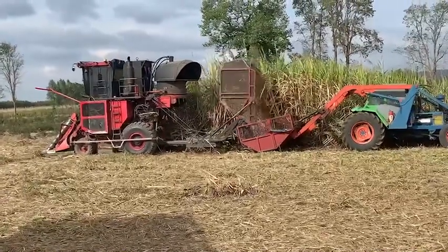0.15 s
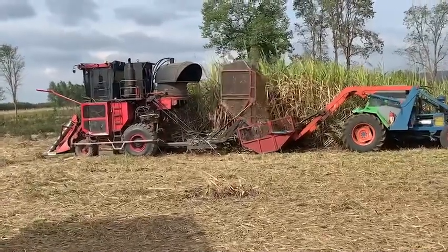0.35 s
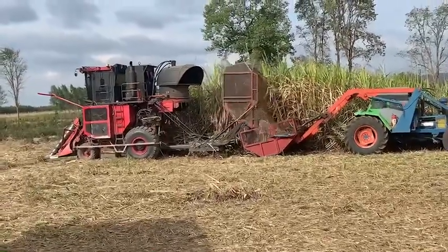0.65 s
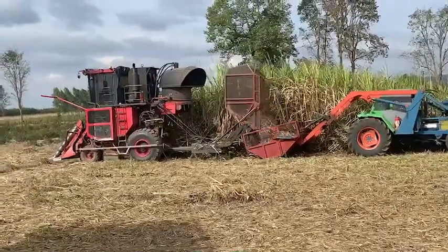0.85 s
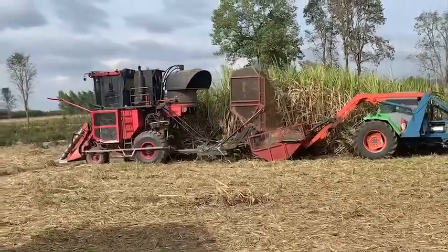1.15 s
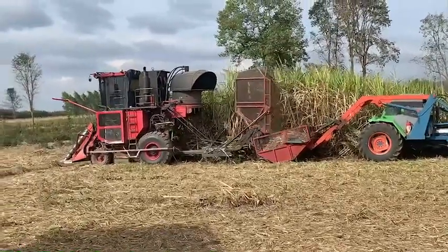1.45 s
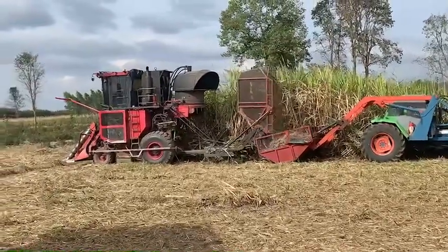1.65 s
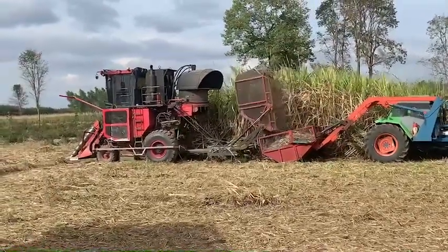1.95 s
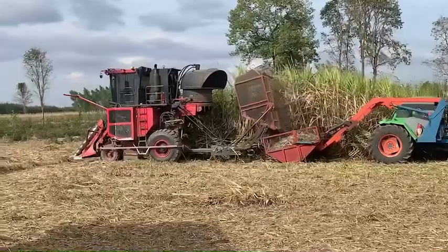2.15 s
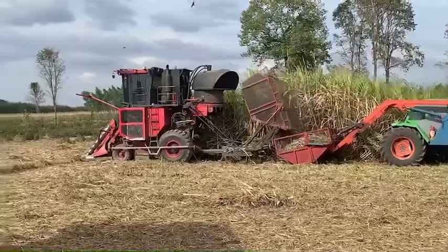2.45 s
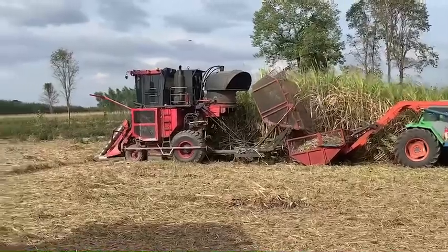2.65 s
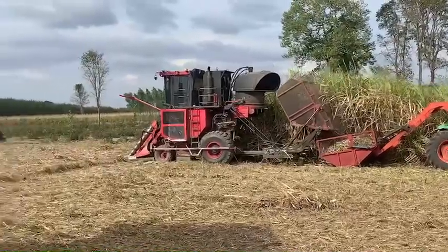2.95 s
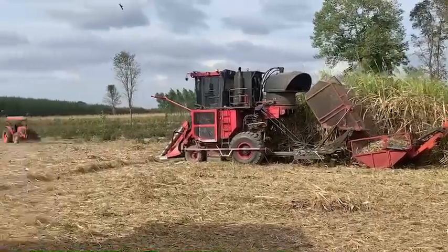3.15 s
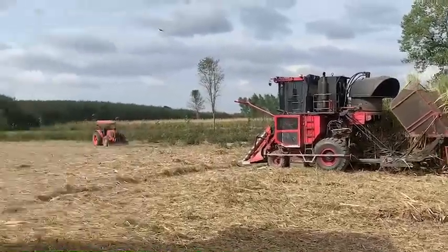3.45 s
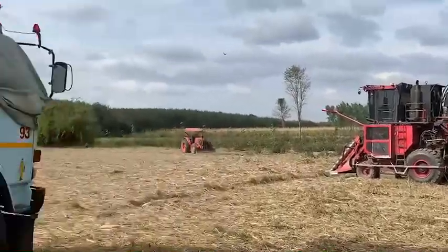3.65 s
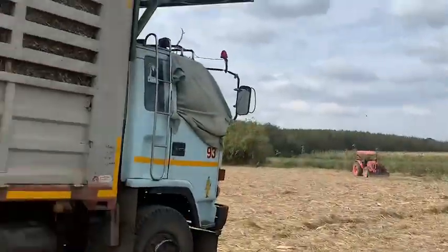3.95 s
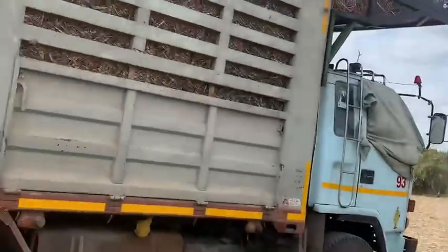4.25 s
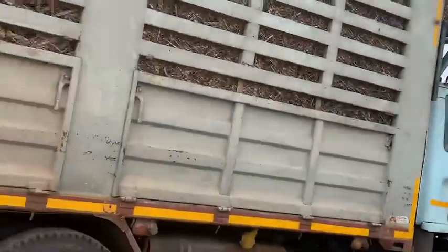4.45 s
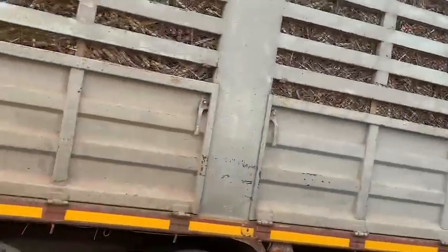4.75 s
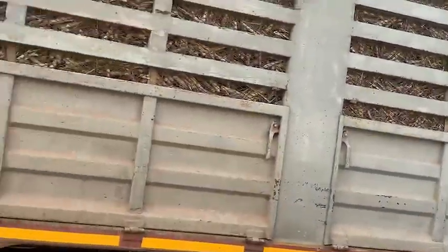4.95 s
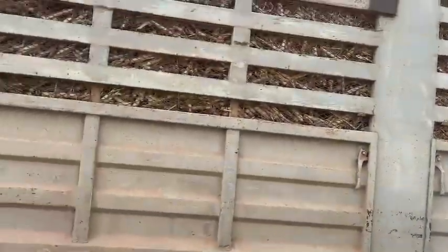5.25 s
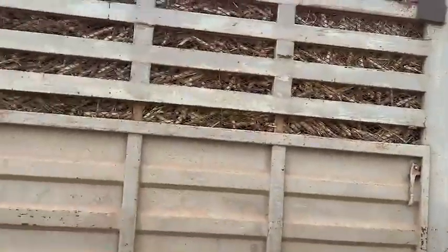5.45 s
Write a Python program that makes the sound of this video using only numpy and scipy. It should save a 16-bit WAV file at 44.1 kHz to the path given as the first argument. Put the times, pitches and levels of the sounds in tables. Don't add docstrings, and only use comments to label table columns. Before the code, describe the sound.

Heavy farm machinery drones and chops cane in an open field, a whine riding on top, then gusty wind buffets the microphone.

```python
import sys
import numpy as np
from scipy import signal
from scipy.fft import rfft, irfft, next_fast_len
from scipy.io import wavfile
from scipy.ndimage import uniform_filter1d, map_coordinates

SR = 44100
rng = np.random.default_rng(int(sys.argv[2]) if len(sys.argv) > 2 else 0)


def dump_mix(stems):
    frames = np.atleast_2d(stems).T
    limited = np.clip(frames, -1, 1)
    pcm = np.round(limited * 32767).astype(np.int16)
    wavfile.write(sys.argv[1], SR, pcm)


def makeup_ratio(level_db):
    decades = np.asarray(level_db, float) / 20
    return 10 ** decades


N = 246507

# time in seconds, level in dB.
BREEZE = [(0, -30.5), (.4, -24), (.75, -29), (1.0, -30), (1.5, -33), (2.2, -37), (2.45, -27.5), (2.9, -23),
          (3.4, -29), (4.3, -32), (4.9, -27.5), (5.59, -21.5)]
# crest in seconds, level in dB, rise in seconds.
GUSTS = [(.31, -20, 0.024), (.6, -36, 0.031), (1.59, -29, .025), (1.95, -29, 0.097), (2.18, -29, 0.11),
         (2.49, -27, 0.074), (2.86, -46, .05), (3.05, -34, 0.04), (4.26, -21, 0.014), (4.43, -14.5, 0.065),
         (4.56, -24, 0.048), (4.63, -28, 0.046), (4.71, -27, .04), (5.05, -22, 0.048), (5.215, -17, 0.11),
         (5.38, -18, 0.058), (5.525, -21, 0.041)]
# start in seconds, peak in dB, length in seconds, left minus right in dB, pitch in Hz.
BUFFETS = [(4.317, -7.5, .005, -4, 398), (4.375, -11, 0.0069, 1, 393.5), (4.409, -1.5, 0.0047, 5, 340),
           (4.409, -4, 0.0023, 1, 620), (4.421, -5.5, .003, 0, 836), (4.439, -6, 0.0034, 0, 463),
           (4.418, 0.5, 0.0034, 2, 423), (4.431, -9, 0.0033, 0, 330), (4.501, -14, .005, 0, 396),
           (4.55, -10, 0.0029, -2, 382), (4.567, -10, 0.0084, 1, 392), (4.603, -6.5, .003, 2, 287),
           (4.637, -5, 0.0028, 2, 420), (4.718, -8, 0.0084, -2, 390), (4.754, -7, 0.004, -4, 530),
           (4.78, -8, 0.003, 0, 257), (5.13, -13, 0.0047, -4, 608), (5.148, -1, 0.0045, 1.0, 394),
           (5.189, -9, 0.0053, 3, 318), (5.225, -7, 0.0069, -3, 288), (5.336, -16, 0.0044, 10, 635),
           (5.329, -4, 0.0054, 3, 337), (5.374, 0.5, 0.0036, 1, 335), (5.382, -2.5, 0.0034, 3, 300),
           (5.446, -17, .005, -3.5, 285), (5.488, -2.5, 0.004, 0, 310), (5.504, -1, 0.003, 1, 331),
           (5.52, -2.5, 0.004, 2, 340)]
# start in seconds, peak in dB, length in seconds,
# left minus right in dB, pitch in Hz.
THUMPS = [(0.323, -7, 0.011, -2, 153), (0.589, -10, 0.014, 4, 130), (2.472, -19, 0.0091, 2, 97),
          (2.859, -7, 0.013, -7, 90), (3.04, -9, 0.01, 3, 170), (3.138, -6, .01, 0, 90),
          (4.238, -14, 0.01, -2, 95), (4.359, -11, .008, 0.0, 94.8), (4.413, 4, 0.0086, 0, 105),
          (4.429, 2, 0.0078, 1, 118), (4.425, -4, 0.01, 0, 197), (4.45, -4, 0.0074, 0, 128),
          (4.553, 2, 0.0098, -2, 99), (4.599, 3, 0.0023, 3, 170), (4.633, 1, 0.0023, 1, 168),
          (4.708, -1, 0.0095, 0, 99), (5.197, -3, 0.005, 7, 120), (5.211, 1, 0.0057, 7, 105),
          (5.239, -7, .006, 0, 110), (5.348, -4, .008, 2, 104), (5.383, -5, 0.0084, -1, 103),
          (5.508, 2, 0.0059, -3, 114), (5.533, 1, 0.0055, -1, 114.2), (5.558, -10, 0.0043, 4, 150)]

# level in dB at idle, at half revs, at top revs.
TRACTOR_ORDERS = [
    (-50, -31, -34),
    (-33.5, -27, -30),
    (-39.5, -34, -42),
]
TRACTOR_IDLE_HZ, TRACTOR_TOP_HZ, REV_START_S, REV_END_S = 39.57, 46.84, 2.2, 3.7

# time in seconds, left lag of the harvester in samples,
# left lag of the chaff stream in samples, left minus right in dB, extra for the chaff in dB.
SWING = [(0, -5.5, -3.5, -1.5, 13), (2.5, -4.5, -5, -1.5, 6), (3.1, -2.5, -2.5, -2.5, 4),
         (3.55, 2.5, 0.5, -4, 13), (3.82, 6, 6, -4.5, 5), (4.03, 9, 9, -3.5, 5.5), (4.24, 14.5, 10, -2, 2),
         (4.36, 13.5, 11, -2, 1), (4.6, 16, 14, -3.5, 3), (4.9, 17.5, 15.5, 1, -10),
         (5.05, 17, 17, -1.5, -2), (5.25, 18, 18, 1, 2.5), (5.59, 17, 17.5, -0.5, 1)]

# start in seconds, length in seconds, pitch in Hz, level in dB.
SQUEALS = [(1.95, .45, 4935, -57), (2.05, .22, 173, -32), (2.2, .12, 3520, -52), (2.39, .09, 3480, -50),
           (2.52, .12, 3490, -44), (2.65, .1, 3490, -45), (2.55, .9, 790, -39), (.75, .25, 215, -34),
           (1.2, .25, 310, -36), (1.75, .25, 305, -35), (2.5, .25, 6964, -59), (2.5, .35, 5590, -59)]

# time in seconds, level in dB.
CHAFF = [(0, -41.5), (.2, -38.5), (.6, -38.5), (.95, -45), (1.7, -41.5), (2.55, -43), (2.8, -40.5),
         (3.3, -41.5), (4.0, -45), (4.4, -42.5), (4.6, -43.5), (5.0, -45), (5.59, -43.5)]
# frequency in Hz, density in dB per Hz.
TOP_COLOUR = [(7200, -4), (8500, 3), (9500, -0.5), (10500, -5.5), (12000, -6), (13500, -10.5), (14500, -17),
              (15300, -14.5)]
# start in seconds, peak in dB, pitch in Hz, width in Hz, 60 dB decay in seconds.
TICKS = [
    (1.83, -24.5, 8100, 11000, .012),
    (2.8255, -30.5, 6767, 700, 0.033),
    (2.84, -36, 6590, 700, 0.043),
    (2.866, -42, 6700, 700, 0.051),
    (2.888, -42, 6800, 600, 0.4),
    (3.165, -36, 6250, 600, 0.057),
    (4.518, -37.5, 6500, 899.6, 0.06),
    (4.957, -41, 14400, 1000, 0.03),
    (4.955, -39, 13300, 1600, 0.12),
    (4.95, -45, 13000, 7000, 0.1),
]
IN_PHASE_HZ, PHASE_TURN_HZ = 10940, 4644
TOP_MID_FROM_HZ, TOP_END_HZ = 14900, 15700

ROAR_CENTRES_HZ = [600, 1400, 3800]
# frequency in Hz, density in dB per Hz.
ROAR_COLOUR = [(40, -35), (70, -20.5), (120, -22.5), (200, -17.5), (300, -21), (360, -17), (600, -14.5),
               (850, -20), (1250, -19), (1600, -20), (2100, -30), (2650, -42), (3200, -33.5), (7000, -37.5)]
# frequency in Hz, change in dB.
TURNED_COLOUR = [(300, 1), (600, -5), (900, 4.5), (1150, -1.5), (1500, 4.5), (1900, 2.5), (2600, 10.5),
                 (3300, -1), (5000, -3.5)]
# frequency in Hz, likeness from 0 to 1.
LIKENESS = [(60, 0.98), (500, 0.91), (1300, 0.91), (1900, 0.79), (2600, 0.79), (3500, 0.44), (5000, 0.67),
            (6800, 0.04)]
# frequency in Hz, left minus right in dB.
LEAN = [(60, -19), (130, -5), (290, -0.5), (640, -4.5), (1410, 0), (3100, -3), (6820, -5.5), (15000, 0.0)]
# frequency in Hz, width in Hz, lift in dB.
RIDGES = [(302.7, 11, 8.5), (534, 185, 3), (610.6, 66, 6.5), (757, 17, 5.5), (1200, 130, 0.5),
          (2045, 110, 3.5), (2615, 150, 0.5), (3060, 81, 4), (3550, 100, 3), (3610, 74, -2.5),
          (5640, 130, -11)]
# upper limit in Hz, lag factor, extra left minus right in dB when facing away.
BENDING = [(700, 1.58, 0.5), (1000, 1.25, -2.5), (1800, 0.982, -2), (2900, 0.92, -2.5), (8000, 0.912, -2)]
# time in seconds, feed in dB.
FEED = [(0, -1.5), (.6, -1), (1.0, -2), (1.4, 0.5), (1.8, 1), (2.0, -0.5), (2.3, -1), (2.8, -1.5),
        (3.3, -3), (3.6, 0), (3.85, 0.5), (4.2, -0.5), (4.6, -0.5), (4.85, 1), (5.2, -0.5), (5.4, -2),
        (5.59, 2.5)]
FEED_SHARES = [0.87, 0.57, 0.36]
SHADE_DB = [-1.1, -4.5, 0.7]
# time in seconds,
# share thrown back from 0 to 1, share of scatter lost in the chaff band from 0 to 1.
THROWN = [
    (0, 0, 0),
    (3.45, 0, 0),
    (3.7, 1, .3),
    (3.82, 1, .75),
    (4.0, 1, .75),
    (4.2, 0, .75),
    (4.33, 0, .75),
    (4.45, 0, 0),
    (5.59, 0, 0),
]
GLANCE_S, GLANCE_LENGTH_S, GLANCE_HZ, GLANCE_DB = 3.58, 0.63, 2540, 3.5
GLANCE_LEAD, GLANCE_HOLLOW = 4.1, 0.3
SHADOW_HZ, SHADOW_WIDTH_HZ = 1870, 660

# time in seconds, pump rate in Hz.
SHAFT = [
    (0, 331),
    (.5, 328.5),
    (.7, 324),
    (.85, 326.3),
    (1.1, 334.6),
    (1.78, 334.2),
    (2.05, 329.4),
    (2.4, 328.8),
    (5.59, 328.6),
]
# time in seconds, level in dB.
LOADED = [
    (0, -60),
    (.35, -54),
    (.5, -42.5),
    (.85, -51),
    (1.05, -54),
    (1.4, -70),
    (5.59, -70),
]
# time in seconds, oil pressure as whine in dB, left lag in samples.
WHINE = [(0, -52, 6), (.5, -38.5, -2), (.68, -34.5, -6), (.8, -40, -4), (.93, -31.5, -6.5),
         (1.02, -40.5, 1), (1.15, -31.5, -6), (1.78, -34, -7.5), (2.05, -31.5, -6), (2.7, -27.5, -3.5),
         (3.2, -31.5, -1), (3.55, -35, 4), (3.75, -36, 6.5), (3.9, -26, 11), (4.08, -28, 10.6),
         (4.2, -34, 10.5), (4.3, -34, 11.6), (4.42, -43, 12), (4.52, -48, 15.5), (4.62, -34, 17.5),
         (4.72, -32, 22), (4.82, -39, 18), (4.9, -37, 18), (5.1, -34.5, 16.5), (5.3, -40.5, 18.5),
         (5.42, -32.5, 19), (5.59, -43, 17)]
# multiple of the pump rate, level in dB against the high whine.
PUMP = [(14, 1), (15, 0), (16, -4), (17, 2), (18, -1), (19, 0), (20, -3)]
EXHAUST_ORDER, FAN_ORDER, GEAR_ORDER, MOTOR_ORDER = .2027, 1.2, 4.8, 6.2
EXHAUST_DB, EXHAUST_SHADE_DB, FAN_DB, FAN_SHADE_DB = -19, -6, -31, -3
GEAR_ON_S, GEAR_RISE_S, GEAR_IDLE_DB, GEAR_DB, GEAR_FADE_DB_PER_S = 1.73, 0.075, -69, -31, 3
GEAR_SHADE_DB = -11
HIGH_UNDER_GEAR_DB, HIGH_IDLE_DB = -19.5, -56


def in_time(rows):
    s, *columns = np.transpose(rows)
    return [np.interp(np.arange(N) / SR, s, c) for c in columns]


def at_hz(points, hz):
    table = np.array(points)
    return np.interp(np.log(hz), np.log(table[:, 0]), table[:, 1])


def rms_one(x):
    return x / np.sqrt(np.mean(x ** 2) + 1e-20)


def band(x, low_hz, high_hz, order=2):
    return signal.sosfilt(signal.butter(order, [low_hz, high_hz], "band", fs=SR, output="sos"), x)


def resonance(x, hz, width_hz):
    r = np.exp(-np.pi * width_hz / SR)
    poles = [1, -2 * r * np.cos(2 * np.pi * hz / SR), r * r]
    return signal.lfilter(np.array([1, 0, -1]) * (1 - r * r) / 2, poles, x)


def late(x, lag):
    return map_coordinates(x, [np.arange(N) - lag], order=3, mode="nearest")


def drift(rate):
    r = np.exp(-80 * np.pi * rate / SR)
    white = rng.standard_normal(N // 40 + 2002)
    slow = signal.lfilter([1], [1, -2 * r, r * r], white)[2000:]
    return np.interp(np.arange(N) / 40, np.arange(len(slow)), rms_one(slow))


def tone(hz, rms_db, lag, lean_db, wobble_db, wander):
    phase = 2 * np.pi * np.cumsum(hz) / SR + wander * drift(9.1) + rng.uniform(0, 2 * np.pi)
    lean = makeup_ratio(np.array([[.5], [-.5]]) * lean_db)
    pair = np.sin([phase - 2 * np.pi * hz * lag / SR, phase]) * lean
    return np.sqrt(2) * makeup_ratio(rms_db + wobble_db * drift(10.6)) * pair


def facing_away(lag):
    return np.clip((lag - .3) / 4.5, 0, 1)


def gust_level():
    t, power = np.arange(N) / SR, makeup_ratio(2 * in_time(BREEZE)[0])
    for s, db, rise in GUSTS:
        power = power + makeup_ratio(2 * db) * np.exp(-3.0 * ((t - s) / rise) ** 2)
    return np.sqrt(power)


def wind(alike):
    white = rng.standard_normal((3, N))
    rumble = band(band(white, 49.3, 362), 47, 95.5, order=1)
    shared, *own = rumble * [makeup_ratio(2.2 * drift(34.0)) for _ in range(3)]
    return gust_level() * rms_one(np.sqrt(alike) * shared + np.sqrt(1 - alike) * np.array(own))


def buffets():
    out, t = np.zeros((2, N + SR)), np.arange(SR // 10) / SR
    for s, db, length, lean_db, hz in BUFFETS + THUMPS:
        white = band(rng.standard_normal((3, len(t))), hz / 1.95, min(1.83 * hz, 1040))
        shared, *own = band(white, 52, 1092, order=1)
        rough = rms_one(shared + 0.51 * np.array(own))
        swing = np.sqrt(2) * np.sin(2 * np.pi * hz * t) + .4 * rough
        shape = t / length * np.exp(1 - t / length) * np.exp(-(t / (2.35 * length)) ** 2)
        level = makeup_ratio(db - 13.0 + np.array([[lean_db], [-lean_db]]) / 2)
        at = round(s * SR)
        out[:, at:at + len(t)] += level * shape * swing
    return out[:, :N]


def tractor(lag):
    revs = np.clip((np.arange(N) / SR - REV_START_S) / (REV_END_S - REV_START_S), 0, 1)
    firing = TRACTOR_IDLE_HZ + revs * (TRACTOR_TOP_HZ - TRACTOR_IDLE_HZ)
    out = 0
    for k, levels_db in enumerate(TRACTOR_ORDERS, 1):
        db = np.interp(revs, [0, .5, 1], levels_db)
        out = out + tone(k * firing, db, lag, lean_db=6.0, wobble_db=1.5, wander=0.55)
    return out


def squeals(lag):
    t, out = np.arange(N) / SR, 0
    for s, length, hz, db in SQUEALS:
        swell = np.sin(np.pi * np.clip((t - s) / length, 0, 1)) ** .5
        pitch = np.full(N, float(hz))
        out = out + swell * tone(pitch, db, lag, lean_db=-4.0, wobble_db=2.5, wander=0.9)
    return out


def chaff_hiss(level_db, lag):
    white, hiss = rng.standard_normal((2, N)), 0
    edges = [7000, 8000, 9100, 10200, 11400, 12700, 14000, 16400]
    for k, (a, b) in enumerate(zip(edges, edges[1:])):
        opened_db = 7.2 * np.clip((lag + 4.2) / 1.2, 0, 1) * (a > 13500)
        patch_db = 0.46 * drift(13.0) + 1.9 * drift(20)
        gain = makeup_ratio(at_hz(TOP_COLOUR, np.sqrt(a * b)) + opened_db + patch_db)
        hiss = hiss + gain * band(white[k % 2], a, b, order=3)
    return makeup_ratio(level_db + 0.47 * drift(6.9)) * rms_one(hiss)


def add_ticks(hiss):
    t = np.arange(SR // 10) / SR
    for s, db, hz, width_hz, t60 in TICKS:
        burst = band(rng.standard_normal(len(t)), hz - width_hz / 2, hz + width_hz / 2)
        at = round(s * SR)
        hiss[at:at + len(t)] += makeup_ratio(db - 60 * t / t60) * rms_one(burst)
    return hiss


def top_hiss(level_db, lag):
    hiss = add_ticks(chaff_hiss(level_db, lag))
    size = next_fast_len(N)
    hz = np.arange(size // 2 + 1) * SR / size
    angle = np.pi * (hz - IN_PHASE_HZ) / PHASE_TURN_HZ
    whole, side = np.cos(angle), np.sin(angle)
    mid = whole * (abs(whole) > .45) * ((hz < 13000) | (hz > TOP_MID_FROM_HZ))
    side = side * (abs(side) > .45)
    fringe = whole * (abs(whole) > .2) * (abs(whole) <= .45) * (hz < 12700)
    fringe = fringe + whole * (hz > TOP_MID_FROM_HZ - 400) * (hz <= TOP_MID_FROM_HZ)
    spectrum = rfft(hiss, size) * (hz < TOP_END_HZ) / np.maximum(np.hypot(mid, side), .7)
    flicker = np.clip(2.0 * drift(18.0) - .3, 0, 1) * irfft(spectrum * fringe, size)[:N]
    missing = irfft(spectrum * (whole - mid), size)[:N]
    for s, _, _, width_hz, _ in TICKS:
        if width_hz > 5000:
            flicker += (abs(np.arange(N) / SR - s) < .035) * missing
    left = irfft(spectrum * (mid - 1j * side), size)
    right = irfft(spectrum * (mid + 1j * side), size)
    return np.array([left, right])[:, :N] + flicker


def ridges(x):
    for hz, width_hz, db in RIDGES:
        x = x + (makeup_ratio(db) - 1) * resonance(x, hz, width_hz)
    return x


def roar(curves, lag, patchy_db, throb):
    t = np.arange(N) / SR
    beat = 1 + throb * np.sin(2 * np.pi * np.cumsum(EXHAUST_ORDER * in_time(SHAFT)[0]) / SR)
    changes = np.array([c - c.mean() for c in curves])
    white, together = ridges(rng.standard_normal((2, 3, N))), drift(10.5)
    away, (thrown, clear) = facing_away(lag), in_time(THROWN)
    glance_db = GLANCE_DB * np.sin(np.pi * np.clip((t - GLANCE_S) / GLANCE_LENGTH_S, 0, 1)) ** .5
    direct, out = np.zeros((len(BENDING), 2, N)), 0
    edges = 57 * 2 ** (np.arange(22) / 3)
    for k, (a, b) in enumerate(zip(edges, edges[1:])):
        hz = np.sqrt(a * b)
        share = [np.interp(np.log(hz), np.log(ROAR_CENTRES_HZ), row) for row in np.eye(3)]
        colour_db = at_hz(ROAR_COLOUR, hz) + away * at_hz(TURNED_COLOUR, hz)
        colour_db = colour_db + glance_db * np.exp(-(np.log(hz / GLANCE_HZ) / 0.12) ** 2)
        patch_db = patchy_db * (0.12 * together + drift(14.0))
        gain = makeup_ratio(colour_db + share @ changes + patch_db)
        pulse = beat if hz > 250 else beat ** 13.0
        straight, *own = gain * band(white[k % 2], a, b) * pulse
        loose = np.clip(1 - at_hz(LIKENESS, hz), 0, 1) * (1 - 0.42 * away)
        loose = loose * (1 - clear * (1900 < hz < 4200))
        lean = makeup_ratio(at_hz(LEAN, hz) / 2 * np.array([[1], [-1]]))
        out = out + np.sqrt(loose) * lean * own
        path = np.searchsorted(np.array(BENDING)[:, 0], hz)
        direct[path] += np.sqrt(1 - loose) * lean * straight
    _, chaff_lag, turn_db, chaff_db = in_time(SWING)
    lags = [lag, lag, lag, chaff_lag - GLANCE_LEAD * thrown, chaff_lag]
    for k, ((left, right), (_, factor, lean_db)) in enumerate(zip(direct, BENDING)):
        if k >= 3:
            lean_db = lean_db + chaff_db
        tilt_db = lean_db * away / 2
        out = out + [late(left, factor * lags[k]) * makeup_ratio(tilt_db), right * makeup_ratio(-tilt_db)]
    out = out - (0.64 * away + GLANCE_HOLLOW * thrown) * resonance(out, SHADOW_HZ, SHADOW_WIDTH_HZ)
    turn_db = turn_db + 2.0
    return band(out, 20.6, 6950, order=6) * makeup_ratio(np.array([turn_db, -turn_db]) / 2)


def harvester_tones(lag):
    pump, (whine_db, whine_lag) = in_time(SHAFT)[0], in_time(WHINE)
    since = np.arange(N) / SR - GEAR_ON_S
    exhaust_db = EXHAUST_DB + EXHAUST_SHADE_DB * np.clip((lag - 11.0) / 12.0, 0, 1)
    fan_db = FAN_DB + FAN_SHADE_DB * facing_away(lag + 7.6)
    engaged = np.clip(since / GEAR_RISE_S, 0, 1)
    gear_db = GEAR_IDLE_DB + engaged * (GEAR_DB - GEAR_IDLE_DB - GEAR_FADE_DB_PER_S * since)
    high_db = np.where(since > GEAR_RISE_S, gear_db + HIGH_UNDER_GEAR_DB, HIGH_IDLE_DB)
    shaded_gear_db = gear_db - 4 + GEAR_SHADE_DB * np.clip((lag - 8) / 6, 0, 1)
    whine_lean_db = -3.5 + 2 * facing_away(lag + 2)
    boom = EXHAUST_ORDER * pump
    out = tone(boom, exhaust_db, 0.75 * lag + 4.3, lean_db=-3.5, wobble_db=-0.2, wander=0.018)
    out += tone(2 * boom, exhaust_db - 16, lag, lean_db=-4.5, wobble_db=3.0, wander=0.2)
    out += tone(FAN_ORDER * pump, fan_db, 1.6 * lag, lean_db=2.0, wobble_db=.8, wander=.1)
    out += tone(GEAR_ORDER * pump, shaded_gear_db, lag, lean_db=-1.5, wobble_db=3.0, wander=.3)
    out += tone(MOTOR_ORDER * pump, in_time(LOADED)[0], lag, lean_db=-9.0, wobble_db=6.5, wander=.4)
    out += tone(3 * pump, -45, lag, lean_db=-1.5, wobble_db=3.0, wander=1.0)
    out += tone(5 * pump, whine_db, whine_lag, lean_db=whine_lean_db, wobble_db=1.8, wander=.3)
    for k, db in PUMP:
        out += tone(k * pump, high_db + db - 5, lag, lean_db=-4.0, wobble_db=2.5, wander=.6)
    return out + tone(np.full(N, 6964.), -66, lag, lean_db=0.0, wobble_db=2.5, wander=.9)


def scene():
    lag, feed_db = in_time(SWING)[0], in_time(FEED)[0]
    away = facing_away(lag + 2.3)
    layers_db = [share * feed_db + db * away for share, db in zip(FEED_SHARES, SHADE_DB)]
    noise = makeup_ratio(-22.5) * rms_one(roar(layers_db, lag, patchy_db=1.5, throb=0.023))
    machines = harvester_tones(lag) + tractor(lag) + noise + squeals(lag)
    return machines + top_hiss(in_time(CHAFF)[0], lag) + wind(alike=0.81) + buffets()


def drop_weaker(x, under_db, starved_db):
    _, _, cells = signal.stft([x[0] + x[1], x[0] - x[1]], nperseg=1536, noverlap=768)
    power = uniform_filter1d(uniform_filter1d(abs(cells) ** 2, size=7, axis=1), size=2, axis=2)
    keep = power > power[::-1] * makeup_ratio(2 * under_db)
    usual = uniform_filter1d(uniform_filter1d(power, size=21, axis=1), size=15, axis=2)
    keep[:, 80:] &= (power > usual * makeup_ratio(2 * starved_db))[:, 80:]
    keep[:, :30] = True
    mid, side = signal.istft(cells * keep, nperseg=1536, noverlap=768)[1][:, :N]
    return np.array([mid + side, mid - side]) / 2


def band_limit(x):
    return signal.sosfilt(signal.butter(12, 16890, fs=SR, output="sos"), x)


def record(dry):
    dry = signal.sosfilt(signal.butter(3, 38, "high", fs=SR, output="sos"), dry)
    dry = 1.3 * np.tanh(dry / 1.3)
    dry = signal.sosfilt(signal.cheby2(14, 70, 16600, fs=SR, output="sos"), dry)
    mix = drop_weaker(dry, under_db=-12.5, starved_db=-4.5)
    return band_limit(mix)


dry = scene()
out = record(dry)
dump_mix(out)
```